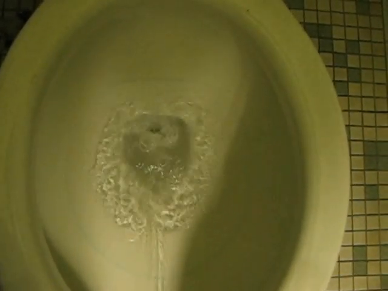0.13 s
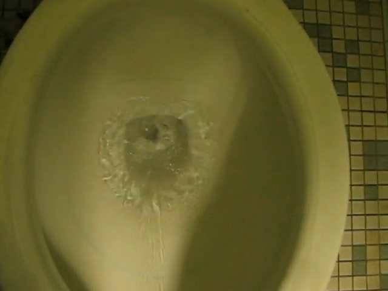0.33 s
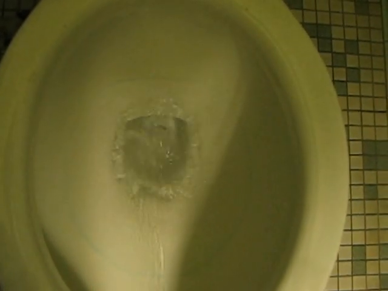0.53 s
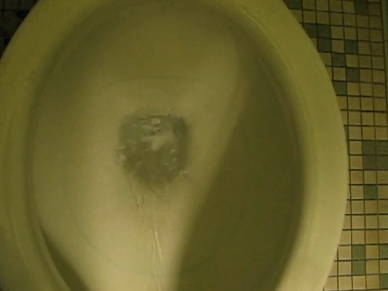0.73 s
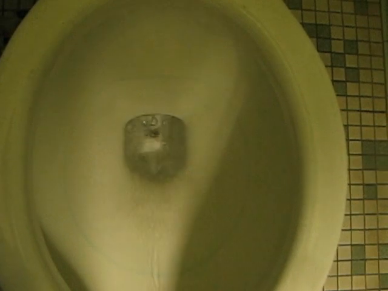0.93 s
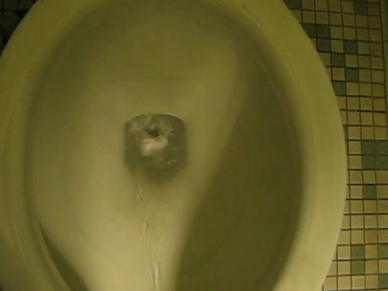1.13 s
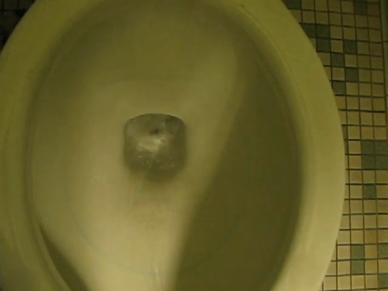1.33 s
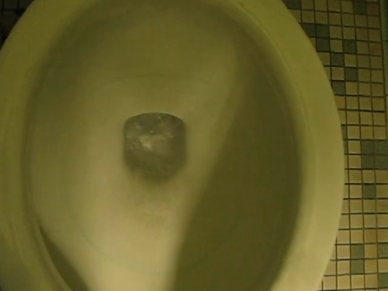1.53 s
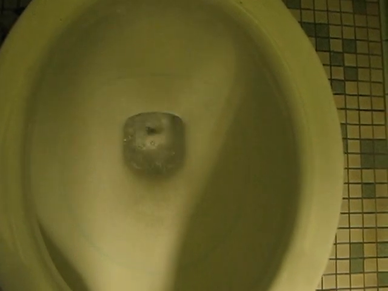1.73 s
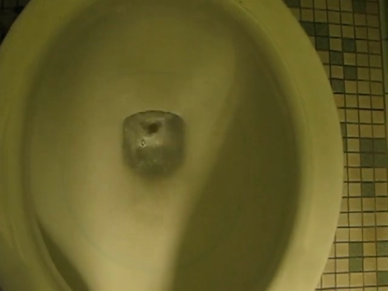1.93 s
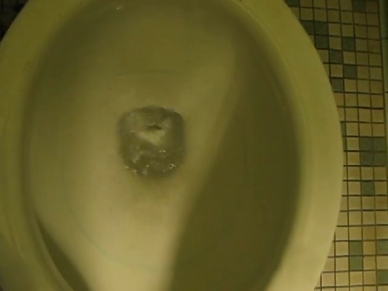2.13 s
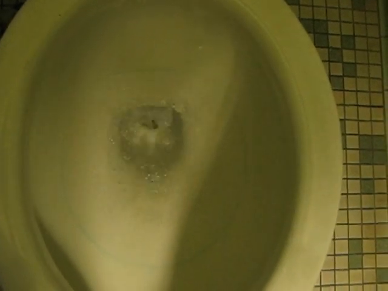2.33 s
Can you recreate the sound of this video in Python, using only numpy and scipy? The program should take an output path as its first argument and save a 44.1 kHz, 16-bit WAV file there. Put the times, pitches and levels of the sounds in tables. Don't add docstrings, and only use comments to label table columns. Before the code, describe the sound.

A toilet flush nears its end: water hisses and ticks round the bowl, thins, then the drain gulps air in a loud bubbly gurgle and stops, leaving drips. Small tiled bathroom, close cheap low-fidelity microphone.

```python
import sys
import numpy as np
from scipy import signal
from scipy.fft import rfft, irfft, next_fast_len
from scipy.io import wavfile
from scipy.ndimage import uniform_filter1d, map_coordinates

SR = 44100
rng = np.random.default_rng(int(sys.argv[2]) if len(sys.argv) > 2 else 0)


def to_wav(s):
    ch = np.atleast_2d(s).T
    pcm = np.round(np.clip(ch, -1, 1) * 32767)
    wavfile.write(sys.argv[1], SR, pcm.astype(np.int16))


def level_to_linear(level):
    exponent = np.asarray(level, float) / 20
    return 10 ** exponent


N = 109853

# centre_hz, width_hz, level_db
PIPE_MODES = [(60.3, 14, 0.5), (90.3, 15, 0.5), (109.1, 16, 1.5), (182.2, 40, -3.5)]
# start_s, peak_db, pitch_hz
PIPE_THUDS = [
    (0.669, -25.5, 89),
    (0.778, -31, 107.9),
    (1.032, -25.5, 66.6),
    (1.154, -31, 109),
    (1.281, -24.5, 49.9),
    (1.453, -28, 86),
]
# centre_hz, width_hz, level_db
MOUTH_MODES = [(903, 11, 0), (946, 14, -3)]
# start_s, peak_db
DRAIN_DRIPS = [(0.09, -32.5), (0.219, -29.5), (0.296, -30), (0.418, -30), (0.478, -28.5), (0.662, -29.5),
               (0.684, -28.5), (0.87, -32.5), (0.95, -25.5), (1.064, -20.5), (2.145, -27), (2.233, -28),
               (2.387, -31.5), (2.443, -40)]
# time_s, level_db
FLOW_LEVEL = [
    (0, -33.5),
    (.45, -36),
    (.85, -40),
    (1.2, -35.5),
    (2.0, -40.5),
    (2.12, -49),
    (2.49, -49.5),
]
# freq_hz, density_db_per_hz
SHEET_SPECTRUM = [(110, -30.5), (200, -1.5), (476, -2), (894, -5), (1080, -8), (1280, -13), (1800, -12.5),
                  (2470, -3.5), (5500, -11.5), (7150, -33), (12100, -120)]
# centre_hz, width_hz, level_db
POOL_MODES = [(256, 14, 2), (333, 22, 6), (1305, 36, 8), (2330, 260, 6.5)]
# start_s, peak_db, pitch_hz
DROPLET_TICKS = [(0.0159, -26, 4520), (0.0593, -28, 4160), (0.1072, -26, 4470), (0.1286, -24.5, 4240),
                 (0.174, -26.5, 4280), (0.2783, -26, 4590), (0.3237, -36, 4200), (0.3696, -29, 4810),
                 (0.4199, -40, 4480), (0.4334, -30, 4920), (0.4903, -31, 4250), (0.5746, -32.5, 4330),
                 (0.6973, -33, 5040), (0.7267, -33.5, 4450), (0.7622, -41.5, 4370), (0.7746, -34, 4920),
                 (0.829, -33.5, 5020), (0.8495, -26.5, 4350), (0.8919, -43, 4220), (0.9198, -27, 5290),
                 (0.9852, -27.5, 4440), (1.0904, -38, 4220), (1.1383, -28, 5060), (1.1568, -27, 4530),
                 (1.1847, -20, 4490), (1.2526, -29, 4930), (1.2805, -20, 4870), (1.3598, -30.5, 4570),
                 (1.3788, -23.5, 4050), (1.4282, -36.5, 4280), (1.4895, -32, 4410), (1.5234, -29.5, 4350),
                 (1.5848, -22, 4584), (1.5953, -17, 4170), (1.7175, -32.5, 4020), (1.7384, -37.5, 4250),
                 (1.7674, -22, 5010), (1.8238, -26.5, 4260), (1.8557, -29.5, 4330), (1.922, -35, 4190)]
# time_s, level_db
AIR_DRAW = [
    (1.18, -51.5),
    (1.27, -24),
    (1.6, -22),
    (1.77, -23),
    (1.92, -25.5),
    (2.01, -23),
    (2.08, -33),
    (2.3, -46),
]
# freq_hz, density_db_per_hz
FROTH_SPECTRUM = [(88, -78), (150, -26.5), (247, 0), (431, -4), (1000, -15.5), (1200, -5), (1970, -27),
                  (2550, -10.5), (5500, -27), (7150, -92.5), (12100, -120)]
# start_s, peak_db, pitch_hz, t60_s
GULP_BUBBLES = [(1.242, -16, 688, 0.05), (1.274, -12.5, 655, 0.03), (1.332, -12, 349.5, 0.039),
                (1.348, -22, 462, 0.087), (1.373, -11, 331, 0.04), (1.408, -14.5, 580, 0.026),
                (1.436, -17.5, 442, 0.066), (1.492, -12.5, 431, 0.07), (1.522, -12, 476, 0.028),
                (1.572, -11.5, 649, 0.036), (1.576, -11.5, 317, 0.085), (1.684, -22.5, 447, 0.093),
                (1.708, -18, 356, 0.04), (1.734, -13, 581, 0.022), (1.788, -21, 659, 0.046),
                (1.83, -12.5, 439.6, 0.046), (1.856, -13.5, 604, 0.044), (1.898, -7, 373, 0.024),
                (1.9, -13, 642, 0.045), (1.913, -11, 443, 0.028), (1.945, -16, 429, 0.04),
                (1.979, -16, 312.4, 0.057), (1.996, -16.5, 336.4, 0.023), (2.01, -17, 335, 0.027)]
# start_s, peak_db, pitch_hz, t60_s
DEEP_GLUGS = [
    (1.269, -4, 421.4, 0.11),
    (1.283, -8, 320, .14),
    (1.289, -5.5, 418.3, 0.089),
    (1.858, -10, 256.4, .09),
]
# start_s, peak_db, pitch_hz, t60_s
POP_BUBBLES = [(0.02, -27, 330.5, 0.17), (0.07, -27.5, 329, 0.17), (0.337, -23, 1303, 0.11),
               (0.5, -27.5, 1310, 0.046), (0.535, -29.5, 1340, 0.055), (0.565, -26, 1296, 0.1),
               (1.024, -27.5, 665, 0.15), (1.19, -20, 1438, 0.076), (1.228, -15, 1340, 0.027),
               (1.263, -14, 1138, 0.064), (1.347, -20.5, 891, 0.075), (1.375, -20.5, 948, 0.047),
               (1.408, -14.5, 1135, 0.063), (1.445, -17.5, 832, 0.059), (1.495, -17.5, 1293, 0.13),
               (1.527, -4, 1180, 0.026), (1.596, -11, 1168, 0.042), (1.811, -14.5, 1302, 0.038),
               (1.818, -12.5, 1160, 0.033), (1.857, -15, 1135, 0.023), (1.897, -21, 952, 0.053)]
# start_s, peak_db, pitch_hz, t60_s
SPLASHES = [(0.8948, -19.5, 2495, 0.024), (0.9344, -30.5, 2500, 0.035), (0.9709, -16.5, 2200, 0.06),
            (0.986, -24, 2246, 0.19), (1.0495, -26, 1788, 0.092), (1.0976, -15.5, 3584, 0.019),
            (1.1668, -21, 2710, 0.03), (1.1844, -22.5, 2224, 0.15), (1.2263, -13.5, 3040, 0.033),
            (1.264, -12, 3350, 0.066), (1.3792, -13, 3062, 0.055), (1.4377, -20, 3900, 0.11),
            (1.454, -15.5, 2574, 0.03), (1.4713, -20.5, 2645, 0.044), (1.5839, -20.5, 2432, 0.11),
            (1.6392, -16.5, 2503, 0.03), (1.6785, -24.5, 2600, 0.034), (1.738, -13.5, 3930, 0.033),
            (1.7663, -27.5, 2497, 0.043), (1.801, -27.5, 2600, 0.021), (1.826, -21, 2077, 0.08),
            (1.832, -21, 3476, 0.063), (1.8554, -16, 3983, 0.043), (1.8776, -11.5, 2740, 0.02),
            (1.9046, -23.5, 2490, 0.017), (1.922, -23.5, 3980, 0.06), (1.93, -17.5, 3155, 0.045),
            (1.933, -20.5, 2622, 0.15), (1.9912, -18, 3340, 0.041), (2.165, -24.5, 2950, 0.061),
            (2.1722, -18.5, 2718, 0.03)]
# start_s, peak_db, pitch_hz
FILM_SNAPS = [(1.348, -19.5, 680), (1.380, -12, 750), (1.409, -10.5, 718), (1.447, -21.5, 796),
              (1.495, -15, 713), (1.574, -8, 641), (1.581, -16, 500), (1.740, -14.5, 810),
              (1.833, -10.5, 500), (1.857, -9, 634), (1.899, -18, 794), (1.915, -9, 587),
              (1.983, -17.5, 636), (2.000, -12.5, 950)]
# centre_hz, width_hz, level_db
BOWL_MODES = [(256, 5, 13), (324, 9, 13), (420, 12, 1), (437, 5, 9), (594, 16, 5), (648, 14, 5),
              (759, 16, 4), (1170, 50, 3), (2600, 200, 4)]
# freq_hz, t60_s
TILE_DECAY = [(200, .45), (1000, .3), (3000, .16), (6000, .12)]
# freq_hz, gain_db
SMOOTHING_GAIN = [(4000, -0.5), (5000, -4.5), (5500, -6), (6000, -13.5), (6500, -27), (6900, -36),
                  (7150, -73), (7400, -110)]

RUMBLE_DB, THUD_T60_S = -45.5, 0.45
TRICKLE_DB, TRICKLE_FOLLOWS = -43, 0.66
TICK_T60_S, SNAP_CYCLES = 0.022, 5
TRAP_LOW_HZ = 225
CHOKE_S, CHOKE_LASTS_S, CHOKE_DB = 1.316, 0.031, -14
WET_DB = -12
WHINE_HZ, WHINE_DB = 4290, -54.5
SLOWER, STEP, OFFSET = 4, 0.0077, -0.0024


def unit(x):
    return x / np.sqrt(np.mean(x ** 2) + 1e-20)


def along(points, hz):
    f, v = np.transpose(points)
    return np.interp(np.log(hz + 1), np.log(f + 1), v)


def curve(rows, **ends):
    return np.interp(np.arange(N) / SR, *np.transpose(rows), **ends)


def wobble(rate_hz):
    knots = rng.standard_normal(int(N * rate_hz / SR) + 4)
    return np.clip(map_coordinates(knots, [np.arange(N) * rate_hz / SR]), -2, 1.6)


def filtered(x, response):
    m = next_fast_len(N + SR // 2)
    return irfft(rfft(x, m) * response(np.fft.rfftfreq(m, 1 / SR)), m)[..., :N]


def resonances(modes):
    def response(f):
        total = 0
        for k, (centre_hz, width_hz, db) in enumerate(modes):
            damping = 1j * f * width_hz
            total = total + (-1) ** k * level_to_linear(db) * damping / (centre_hz ** 2 - f * f + damping)
        return total
    return response


def rush(spectrum, patchy_db):
    z = signal.stft(rng.standard_normal(N + 512), nperseg=256)[2]
    field = uniform_filter1d(uniform_filter1d(rng.standard_normal(z.shape), 4, 0), 8, 1)
    x = signal.istft(z * level_to_linear(patchy_db * unit(field)), nperseg=256)[1][:N]
    return unit(filtered(x, lambda hz: level_to_linear(along(spectrum, hz))))


def ring(s, db, hz, t60, attack_s, rise, rough, crack, longest_s=0.12):
    t = np.arange(int(SR * 0.14)) / SR
    s, db, hz, t60 = (np.asarray(v)[:, None] for v in (s, db, hz, t60))
    u = t / np.clip(t60, 0.004, longest_s)
    chance = rng.standard_normal((len(s), len(t)))
    shake = rough * np.cumsum(chance, axis=1) * np.sqrt(hz / SR)
    tone = np.sin(2 * np.pi * hz * t * (1 + rise * u) + shake)
    spray = crack * level_to_linear(-40 * u) * uniform_filter1d(chance[:, ::-1], size=4, axis=1)
    envelope = level_to_linear(db - 60 * u) * (1 - np.exp(-t / attack_s)) * np.cos(np.pi / 2 * t / t[-1])
    wave = envelope * (tone + spray)
    at = np.round(s * SR).astype(int) + np.arange(len(t))
    return np.bincount(at.ravel(), wave.ravel(), N + SR)[:N]


def swarm(count, span, mid_hz, spread, cycles, scatter_db):
    r, size = np.clip(rng.standard_normal((2, count)), -2, 2)
    hz = np.clip(mid_hz * np.exp(spread * r), 200, 5300)
    s = rng.uniform(*span, size=count)
    return unit(ring(s, scatter_db * size, hz, cycles / hz, attack_s=0.001, rise=0.12, rough=0.25, crack=0.25))


def choke():
    return level_to_linear(CHOKE_DB * np.exp(-((np.arange(N) / SR - CHOKE_S) / CHOKE_LASTS_S) ** 4))


def rumble():
    flow_db = curve(FLOW_LEVEL)
    low = lambda f: 1 / (1 + (f / 260) ** 8) / (1 + (42 / (f + 1)) ** 6)
    pipes = resonances(PIPE_MODES)
    drone = unit(filtered(rng.standard_normal(N), lambda f: pipes(f) ** 2 * low(f)))
    drone_db = RUMBLE_DB + 0.4 * (flow_db - flow_db.mean()) + 1.5 * wobble(3.0)
    s, db, hz = np.transpose(PIPE_THUDS)
    thuds = ring(s, db, hz, THUD_T60_S + 0 * s, attack_s=0.031, rise=0.06, rough=0.48, crack=0, longest_s=0.6)
    return level_to_linear(drone_db) * drone + filtered(thuds, low)


def trickle():
    flow_db = curve(FLOW_LEVEL)
    mouth = [resonances([mode]) for mode in MOUTH_MODES]
    wide = resonances([(922, 160, 0.0065)])
    hollow = lambda x: filtered(x, lambda f: (mouth[0](f) + mouth[1](f)) * wide(f))
    stir = unit(hollow(level_to_linear(5.5 * wobble(30)) * rng.standard_normal(N)))
    s, db = np.transpose(DRAIN_DRIPS)
    blows = np.bincount(np.round(s * SR).astype(int), level_to_linear(db + 51.0), N)
    return level_to_linear(TRICKLE_DB + TRICKLE_FOLLOWS * (flow_db - flow_db.mean())) * stir + hollow(blows)


def sheet():
    fizz = swarm(count=900, span=(0, 2.48), mid_hz=2600, spread=0.5, cycles=24, scatter_db=4)
    hiss = level_to_linear(1.0 * wobble(5.9) + 1.3 * wobble(40)) * rush(SHEET_SPECTRUM, patchy_db=2.5)
    water = hiss + level_to_linear(-8.5) * fizz
    coloured = unit(water + filtered(water, resonances(POOL_MODES)))
    s, db, hz = np.transpose(DROPLET_TICKS)
    ticks = ring(s, db + 5, hz, TICK_T60_S + 0 * s, attack_s=0.0007, rise=0.089, rough=0.7, crack=0.45)
    return level_to_linear(curve(FLOW_LEVEL) + 4.0) * choke() * coloured + ticks


def gurgle():
    suck = level_to_linear(curve(AIR_DRAW, left=-99, right=-90)) * choke()
    froth = level_to_linear(2.5 * wobble(45)) * rush(FROTH_SPECTRUM, patchy_db=3.5)
    crowd = swarm(count=300, span=(1.15, 2.3), mid_hz=1000, spread=0.5, cycles=14, scatter_db=3.5)
    bed = suck * (level_to_linear(-11.5) * unit(froth) + level_to_linear(-13) * crowd)
    gulps = ring(*np.transpose(GULP_BUBBLES), attack_s=0.0013, rise=0.038, rough=0.3, crack=0.23, longest_s=0.057)
    glugs = ring(*np.transpose(DEEP_GLUGS), attack_s=0.012, rise=0, rough=0.08, crack=0, longest_s=0.2)
    pops = ring(*np.transpose(POP_BUBBLES), attack_s=0.00078, rise=0.0068, rough=0.35, crack=0.26, longest_s=0.21)
    splats = ring(*np.transpose(SPLASHES), attack_s=0.002, rise=0.03, rough=0.6, crack=0.8, longest_s=0.11)
    s, db, hz = np.transpose(FILM_SNAPS)
    snaps = ring(s, db + 5, hz, SNAP_CYCLES / hz, attack_s=0.00036, rise=0.092, rough=0.12, crack=0.13)
    air = bed + snaps + level_to_linear(1.0) * gulps + glugs + level_to_linear(0.5) * pops + level_to_linear(-1.5) * splats
    bowl = resonances(BOWL_MODES)
    above = lambda f: (f * f / (TRAP_LOW_HZ ** 2 - f * f + 1.3j * f * TRAP_LOW_HZ)) ** 2
    return filtered(air, lambda f: above(f) * (1 + level_to_linear(-4.0) * bowl(f)))


def room(x):
    hz, t, z = signal.stft(rng.standard_normal(SR // 2), SR, nperseg=256)
    decay = level_to_linear(-60 * t / along(TILE_DECAY, hz)[:, None])
    tail = signal.istft(z * decay, SR, nperseg=256)[1]
    return signal.fftconvolve(np.pad(x, (200, 0)), tail / np.linalg.norm(tail))[:N]


def scene():
    water = sheet() + gurgle() + trickle()
    return (water + level_to_linear(WET_DB) * room(water) + rumble())[None]


def band_limit(x):
    return signal.sosfilt(signal.butter(12, 7040, fs=SR, output="sos"), x)


def record(dry):
    whine = np.sqrt(2) * level_to_linear(WHINE_DB) * np.sin(2 * np.pi * WHINE_HZ * np.arange(N) / SR)
    x = filtered(dry, lambda hz: hz < SR / SLOWER / 2) + whine + OFFSET
    coarse = np.zeros_like(x)
    coarse[:, ::SLOWER] = SLOWER * STEP * np.round(x[:, ::SLOWER] / STEP)
    mix = filtered(coarse, lambda hz: level_to_linear(along(SMOOTHING_GAIN, hz)))
    return band_limit(mix)


dry = scene()
out = record(dry)
to_wav(out)
```